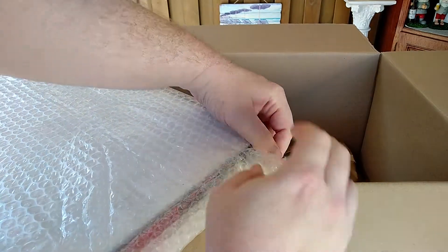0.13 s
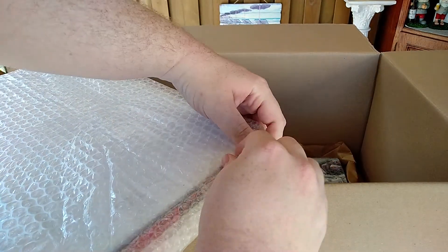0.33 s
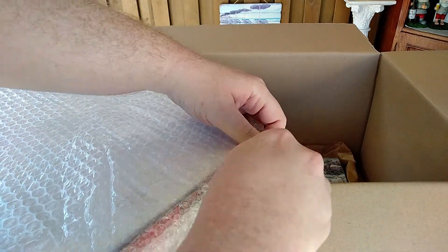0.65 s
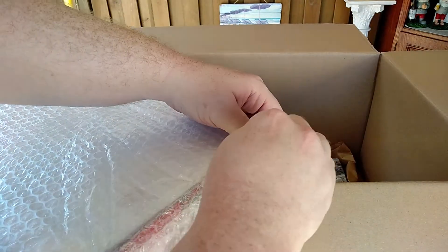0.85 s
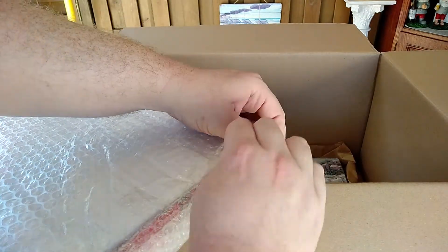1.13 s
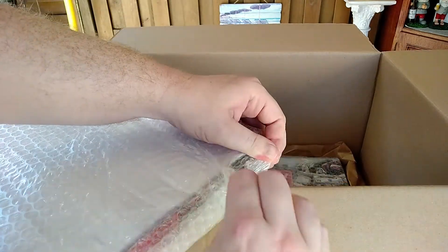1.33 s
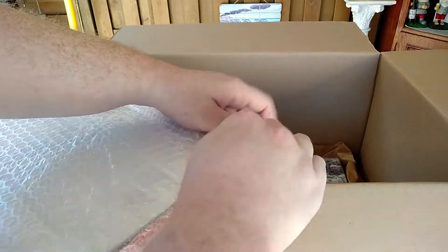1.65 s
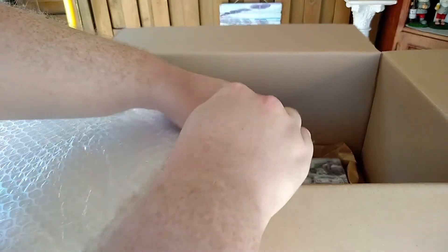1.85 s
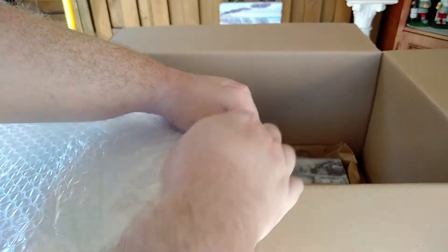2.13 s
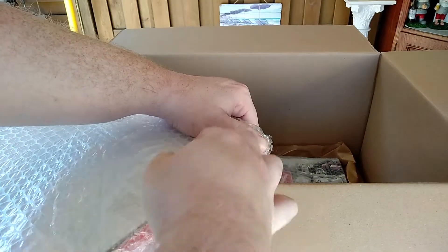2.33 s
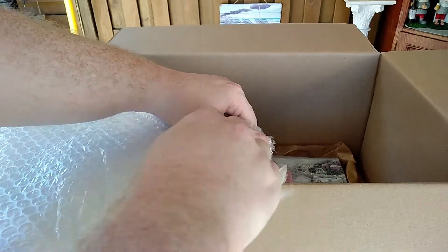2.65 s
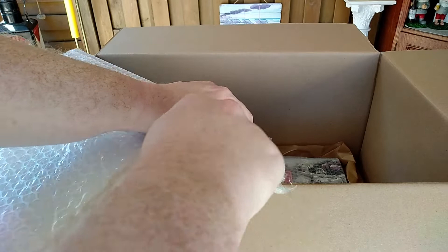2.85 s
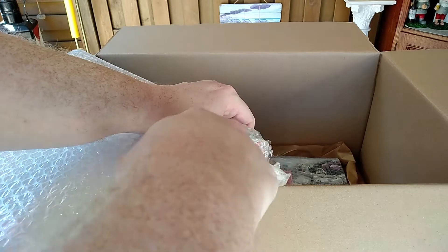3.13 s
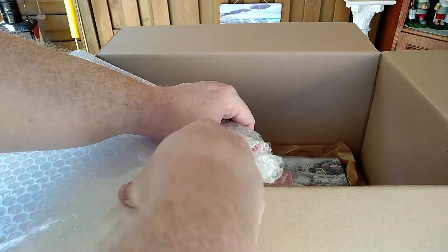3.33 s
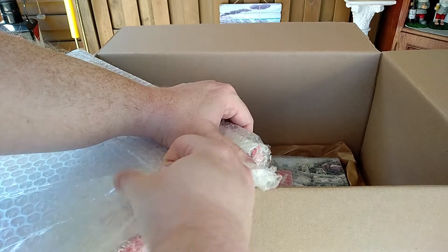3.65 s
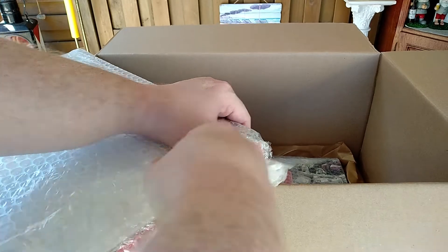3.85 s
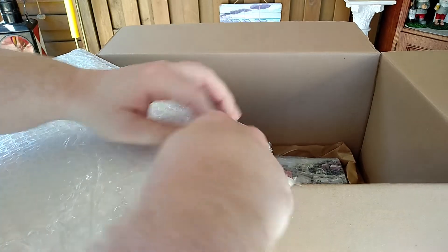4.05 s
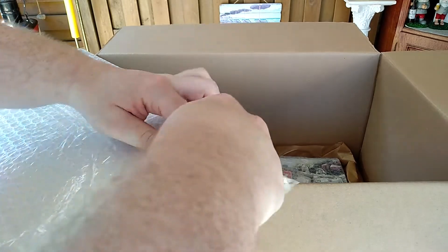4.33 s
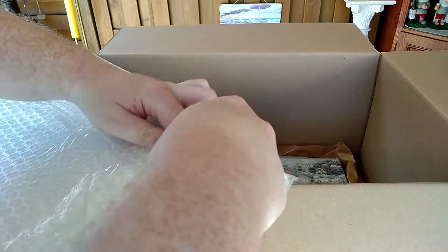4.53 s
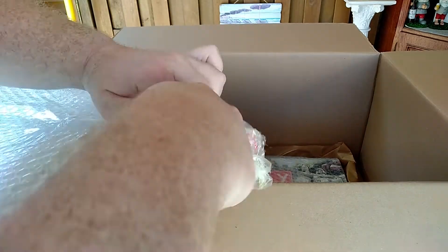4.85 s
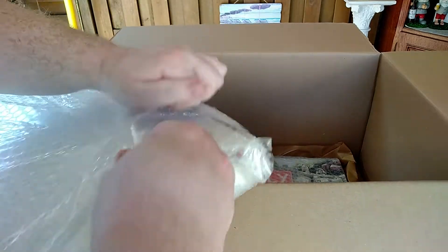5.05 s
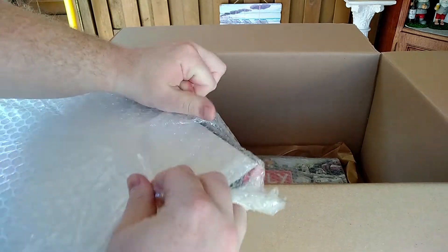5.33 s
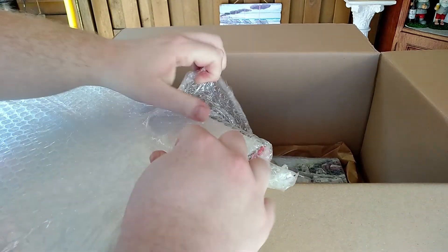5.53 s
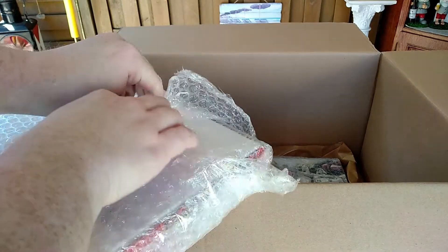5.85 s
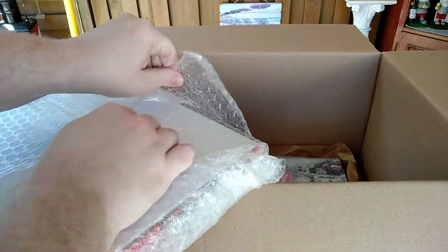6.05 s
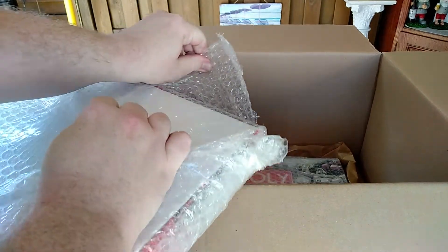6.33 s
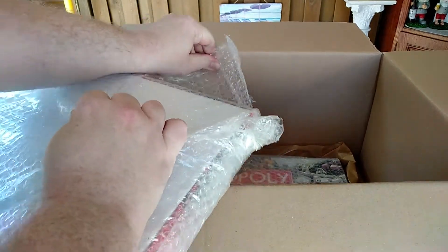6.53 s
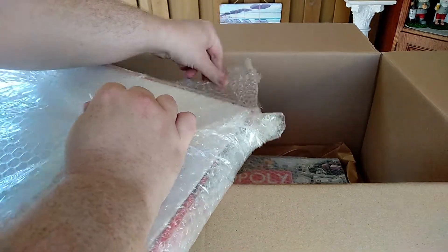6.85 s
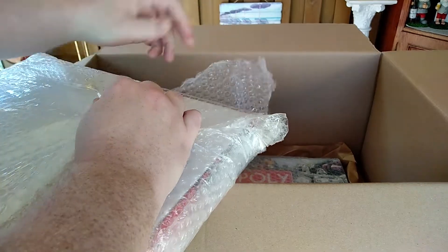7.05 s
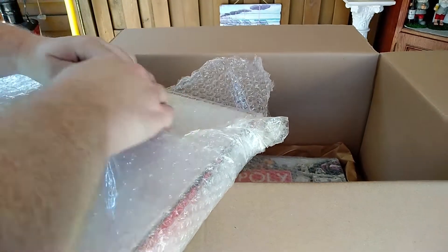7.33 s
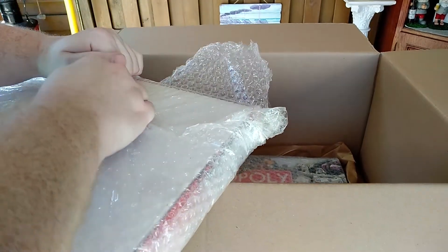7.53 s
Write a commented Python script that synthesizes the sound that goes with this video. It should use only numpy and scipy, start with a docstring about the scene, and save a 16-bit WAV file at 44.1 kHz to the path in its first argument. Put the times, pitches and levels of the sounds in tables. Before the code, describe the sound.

Hands tug and peel bubble wrap from a flat box inside a cardboard carton, crackling, snapping and popping in uneven bursts, ending on a heavy knock.

```python
"""Two hands pull bubble wrap off a flat box in a big cardboard carton, in a small wood-panelled room.
A tug and a few snaps open; near 1 s pulls and crackling crowd together with two pops, then the hands ease off.
Near 2.2 s comes a strong snapping pull, from 3.1 s more pops, near 5 s a loud peel, from 6 s dense snaps and rubs;
the last pulls end on a heavy knock. Film is noise from tiny stick-slips; creases, bubbles and board are
impulses in damped resonators; drags are filtered grains. Light handling, faint air and a hum lie beneath."""
import sys
import numpy as np
from scipy import signal
from scipy.fft import rfft, irfft, next_fast_len
from scipy.io import wavfile
from scipy.ndimage import map_coordinates

SR = 44100
rng = np.random.default_rng(int(sys.argv[2]) if len(sys.argv) > 2 else 0)


def wrap_up_sound(samples):
    """Save the sound to the file named by the first command line argument, as 16-bit audio."""
    columns = np.atleast_2d(samples).T
    # keep every value between -1 and 1, then stretch to whole-number steps
    tamed = np.clip(columns, -1, 1)
    steps = np.round(tamed * 32767).astype(np.int16)
    wavfile.write(sys.argv[1], SR, steps)


N = 339570
TIME = np.arange(N) / SR   # s

# Levels in the tables are relative: mixing trims and filters follow.
# light handling between the moves: t/s, level/dB
HANDLING = [(0.1, -45), (0.42, -53.5), (0.66, -54), (1.45, -42), (1.62, -51), (1.78, -41), (2.0, -50.5),
            (2.44, -45), (2.5, -58), (2.56, -42), (2.68, -44), (3.3, -45.5), (3.64, -46), (3.75, -41.5),
            (3.98, -62), (4.6, -38.5), (5.17, -43.5), (5.66, -51.5), (5.76, -42), (5.86, -34),
            (6.98, -49.5), (7.3, -33)]


def film(pull_db, sheen_db):
    """Stick-slip friction: a patch of wrap slides and peels in jerks; the faster it goes, the thicker the slips."""
    release_db = 2.23 * np.minimum(jerks(per_s=70, dying_s=0.0088), 3)
    speed = from_db(pull_db - 7.0 + drift(43) + release_db)
    sound = speed * sizzle(per_s=700 + 9e4 * speed)
    sheen = (from_db(sheen_db) - 1) * resonate(sound, 13500, 9400)
    return sound + sheen


def sizzle(per_s):
    """Granular friction noise: thin film rubbing on film makes tiny bright slips over a faint hiss."""
    # sliding film: f/Hz, spectral level/dB
    film_spectrum = [(1200, -16), (2500, -14.5), (3300, -11.5), (4100, -8), (4900, -9), (6500, -4.5),
                     (8200, 0.7), (9800, 1.9), (11200, -0.5), (12500, -3.5), (15800, -10)]
    slips = grains(per_s, spread_db=1.5, low_hz=3000, high_hz=15260, cycles=5.7, patchy_db=3.0, count=9)
    hiss = from_db(-6) * rng.standard_normal(N)
    return colour(slips + hiss, film_spectrum)


def crumple(squeeze_db, crisp_db, hollow_hz):
    """Buckling of thin shells: bubbles crushed by one hand give way in fits, crisp when taut, hollow when slack."""
    # crushed bubbles: f/Hz, spectral level/dB
    crush_spectrum = [(300, -22), (600, -12), (1100, -3.5), (2000, 7), (3000, 5), (4500, 3), (7000, -14)]
    level = from_db(squeeze_db - 7.0)
    crackle = grains(258 + 2.5e4 * level, spread_db=4.0, low_hz=460, high_hz=5300,
                     cycles=1.04, patchy_db=2.5, count=9)
    fits_db = 2.2 * np.minimum(jerks(per_s=60, dying_s=.006), 2)
    sound = level * from_db(fits_db) * colour(crackle, crush_spectrum)
    crisp = (from_db(crisp_db) - 1) * resonate(sound, 3500, 3100)
    hollow = (from_db(-.4 * crisp_db) - 1) * resonate(sound, hollow_hz, 650)
    return sound + crisp + hollow


def snaps(pull_db):
    """Snap-through buckling: a crease flips in one damped, shivering swing, and a ragged tick runs along its fold."""
    # creases snapping through: t/s, swing peak level/dB, swing f/Hz, tick peak level/dB
    creases = [(0.01, -16, 3530, -18), (0.104, -30, 1840, -38), (0.119, -28, 1990, -32),
               (0.2378, -36, 3790, -13.5), (0.384, -34, 2110, -40), (0.56, -24, 3450, -22),
               (0.604, -37, 3890, -14), (0.723, -36, 2800, -23), (0.8375, -41, 2540, -22),
               (0.9, -26, 3000, -30), (1.035, -13, 2340, -10), (1.0693, -24, 2800, -6),
               (1.089, -22, 3000, -8), (1.1025, -25, 3000, -15), (1.108, -13, 2080, -17),
               (1.1605, -31, 2000, -2), (1.208, -23, 3000, -12), (1.2452, -23, 3360, -6),
               (1.255, -22.5, 2000, -20), (1.39, -31, 3260, -30), (1.445, -28.5, 1980, -34),
               (1.495, -35, 2070, -42), (1.516, -48, 3000, -26), (1.554, -28, 3970, -27),
               (1.738, -40, 3000, -24), (1.756, -27, 3450, -26), (1.769, -29, 3090, -32),
               (1.856, -28, 2100, -31), (1.899, -26, 3780, -36), (1.956, -33, 1700, -40),
               (2.005, -42, 2775, -40), (2.0363, -30, 2020, -25), (2.049, -13.5, 1900, -14),
               (2.106, -22, 2000, -15), (2.113, -5, 3590, -13), (2.1455, -10.5, 2260, -5),
               (2.1657, -3.5, 3160, -7), (2.1747, -14, 3000, -7), (2.198, -14, 2800, -8),
               (2.2285, -10, 3340, -4), (2.2396, -4.5, 1850, -10), (2.243, -6, 1690, -16),
               (2.314, -32, 2400, -12), (2.33, -18, 1100, -25), (2.422, -34, 3000, -23),
               (2.7138, -24, 1280, -34), (2.745, -29, 2010, -34), (2.797, -29, 2510, -38),
               (2.845, -30, 2150, -26), (2.867, -23, 2020, -28), (3.012, -26, 3890, -34),
               (3.0612, -43, 2930, -5.5), (3.104, -16, 2000, -12), (3.141, -18, 2200, -28),
               (3.282, -36, 3000, -26), (3.4125, -25, 4000, -12), (3.419, -16, 3000, -5),
               (3.436, -6, 1500, -20), (3.4462, -10, 1900, -18), (3.5675, -24.5, 2060, -23),
               (3.666, -35, 1750, -26), (3.694, -46, 3000, -18), (3.834, -5.5, 3000, -12),
               (4.017, -29, 2240, -40), (4.051, -23.5, 2060, -32), (4.273, -26, 1500, -24),
               (4.363, -19, 1800, -39), (4.483, -17.5, 2370, -20), (4.512, -24.5, 1600, -23),
               (4.661, -22, 1500, -22), (4.689, -22, 2008, -25), (4.934, -19, 1580, -16),
               (4.937, -19, 2030, -20), (4.979, -5, 2200, -17), (5.14, -38, 3000, -16),
               (5.2156, -22, 1500, -24), (5.277, -24, 1790, -19), (5.45, -23, 2650, -25),
               (5.51, -30, 1830, -25), (5.551, -20, 1340, -33), (5.615, -21.5, 1900, -20),
               (5.689, -38, 1880, -9.5), (5.731, -38, 2500, -17), (5.891, -27, 1000, -30),
               (5.911, -14.5, 2290, -14), (5.975, -9, 2000, -12), (6.092, -19, 2130, -16),
               (6.18, -16, 1662, -15), (6.207, -10.5, 1970, -15), (6.2545, -34, 3400, -2),
               (6.313, -18, 2160, -16), (6.339, -25, 3500, -9), (6.4528, -20.5, 1110, -13),
               (6.484, -40, 1100, -24), (6.5073, -15, 1700, -8), (6.517, -12, 1500, -18),
               (6.546, -20, 1800, -10.5), (6.662, -23.5, 1010, -32), (7.0422, -21.5, 1065, -43),
               (7.1806, -23, 1650, -25), (7.261, -28, 1580, -23), (7.336, -30, 3200, -2),
               (7.407, -18, 1750, -16), (7.589, -20, 2500, -9)]
    shiver_db, shiver_s, run_s = -19, .0012, .001   # shiver against the flip; fading times
    handled = stray_snaps(in_time(HANDLING)[0], per_s=11, swing_db=2.5, tick_db=11.5)
    pulled = stray_snaps(pull_db, per_s=45, swing_db=-3.0, tick_db=0.0)
    out, click = np.zeros(N), signal.unit_impulse(SR // 50)
    t = TIME[:len(click)]
    for s, swing_db, hz, tick_db in creases + handled + pulled:
        shiver = from_db(shiver_db) * rng.standard_normal(len(t)) * np.exp(-t / shiver_s)
        swing = resonate(click + shiver, 1.01 * hz, 0.65 * hz)
        swing = band(swing, 2.28 * hz, "low")
        run = rng.standard_normal(len(t)) * np.exp(-t / run_s)
        tick = band(resonate(run, 8800, 2600), 6700, "high")
        add(out, s, from_db(swing_db - 2.33) * swing / abs(swing).max())
        add(out, s, from_db(tick_db - 1.5) * tick / abs(tick).max())
    return out


def stray_snaps(level_db, per_s, swing_db, tick_db):
    """Random buckling: small creases let go at chance moments, as strong as the hands are lively."""
    middle_hz, spread_db = 1900, 5.0   # pitch strays an octave, strength spread_db, either way
    s, swing, pitch, tick = rng.random((int(per_s * N / SR), 4)).T
    s = s * N / SR
    db = np.interp(s, TIME, level_db)
    swing_peak_db = db + swing_db + spread_db * (2 * swing - 1)
    tick_peak_db = db + tick_db + spread_db * (2 * tick - 1)
    return list(zip(s, swing_peak_db, middle_hz * 2 ** (2 * pitch - 1), tick_peak_db))


def pops():
    """Impulsive release: a taut bubble gives way with a sharp broad crack, then its skin rings a few cycles."""
    # bubbles: t/s, ring peak level/dB, ring f/Hz, crack peak level/dB
    bubbles = [(0.859, -14, 1450, -8), (1.0187, -8, 1290, -9), (3.085, -5, 1350, -10),
               (3.093, -2.5, 1360, -1), (3.2342, -7, 1160, -9), (3.4244, -6.5, 1310, -9),
               (4.7352, -23, 950, -42)]
    damping = .36   # resonance width against the bubble's pitch
    upper_ratio, upper_db = 1.6, -2   # second mode of the skin
    crack_s = .0006   # fading time
    out, t = np.zeros(N), TIME[:SR // 50]
    click = signal.unit_impulse(len(t))
    for s, db, hz, crack_db in bubbles:
        upper = from_db(upper_db) * resonate(click, upper_ratio * hz, damping * hz)
        ring = resonate(click, hz, damping * hz) + upper
        ring = band(ring, 2.9 * hz, "low")
        burst = 0.19 * rng.standard_normal(len(t)) * np.exp(-t / crack_s)
        crack = band(click + burst, [2400, 5200], "band")
        add(out, s, from_db(db) * ring / abs(ring).max() + from_db(crack_db) * crack / abs(crack).max())
    return out


def squeaks(count=3):
    """Periodic stick-slip: taut film slips fast enough to give a short gliding tone with overtones."""
    # film on film: t/s, length/s, first f/Hz, last f/Hz, level/dB, each overtone against the one below/dB
    glides = [(0.946, 0.015, 1800, 2270, -39.5, -10), (4.849, .037, 2100, 718, -45, -1)]
    jitter, flutter_db = .035, 3   # uneven slipping: pitch (share) and level
    out = np.zeros(N)
    for s, length, first_hz, last_hz, db, overtone_db in glides:
        hz = np.geomspace(first_hz, last_hz, int(length * SR))
        phase = 2 * np.pi * np.cumsum(hz * (1 + jitter * drift(400)[:len(hz)])) / SR
        tone = sum(from_db(k * overtone_db) * np.sin((k + 1) * phase) for k in range(count))
        swell = np.sqrt(np.hanning(len(hz)))
        flutter = from_db(flutter_db * drift(300)[:len(hz)])
        add(out, s, from_db(db + 3) * swell * flutter * tone)
    return out


def box():
    """Forced vibration of a board: the box rumbles under drags, thuds under knocks and groans under judder."""
    return drags() + knocks() + judders()


def drags():
    """Sliding friction: hands dragging on the box excite dull random grains."""
    # drags: peak t/s, build/s, release/s, level/dB
    strokes = [(0.02, 0.078, 0.046, -47), (0.56, 0.018, 0.034, -61), (0.86, 0.0081, 0.02, -33),
               (1.01, 0.014, 0.028, -29), (1.11, .05, 0.16, -46), (1.39, 0.041, 0.077, -40.5),
               (1.85, 0.056, 0.23, -51), (2.17, 0.086, 0.28, -37), (2.31, .15, 0.19, -39.5),
               (2.59, 0.11, 0.12, -46.5), (3.1, 0.095, 0.17, -42), (3.33, 0.04, 0.11, -43.5),
               (3.84, 0.035, 0.11, -39), (4.03, 0.083, 0.022, -48.5), (4.22, 0.18, 0.24, -49),
               (4.4, 0.079, 0.18, -40), (4.68, 0.04, 0.016, -37.5), (4.765, 0.051, 0.083, -38),
               (4.93, 0.02, 0.47, -35), (5.05, 0.2, 0.13, -37), (5.345, 0.091, 0.15, -32),
               (5.55, 0.018, 0.11, -38), (5.98, 0.07, 0.06, -29.5), (6.18, 0.29, 0.34, -35),
               (6.46, 0.036, 0.41, -35), (6.6, 0.028, 0.061, -40), (6.93, 0.15, 0.044, -47),
               (7.1, 0.096, 0.091, -33.5), (7.185, 0.057, 0.048, -36), (7.528, 0.03, 0.055, -29),
               (7.607, 0.017, 0.04, -23.5), (7.65, 0.034, 0.1, -29), (7.69, 0.054, .06, -32.5)]
    # rubbed board: f/Hz, spectral level/dB
    box_spectrum = [(30, -17), (60, -12), (110, -9), (170, -6.5), (300, 3), (550, 3), (900, 1.5),
                    (1600, 4.5)]
    rub = grains(1200, spread_db=5.0, low_hz=81.4, high_hz=1100, cycles=2.4, patchy_db=4.0)
    return from_db(moves(strokes, idle_db=-14)[0] - 5.0) * colour(rub, box_spectrum)


def knocks():
    """Impulse response of a damped board: each knock rings its own mode and a low one they share."""
    # fingers and box: t/s, peak level/dB, f/Hz, width/Hz (wide where the hand damps the board)
    blows = [(0.023, -35.5, 385, 105), (0.18, -45, 480, 200), (0.216, -38.5, 225, 105),
             (0.557, -44.5, 620, 105), (0.983, -42, 200, 105), (1.01, -47, 557, 105),
             (1.551, -43.5, 144, 105), (1.642, -43, 243, 105), (1.952, -43, 415, 105),
             (2.594, -43, 200, 105), (3.305, -34, 204, 105), (3.329, -34.5, 260, 90),
             (3.396, -38, 220, 105), (3.523, -40.5, 735, 150), (3.833, -33.5, 744, 105),
             (4.48, -36, 220, 150), (4.735, -25, 1000, 130), (4.759, -31, 600, 200), (5.224, -29, 330, 150),
             (5.335, -24.5, 390, 110), (5.356, -28, 400, 170), (5.551, -28.5, 553, 200),
             (5.613, -25.5, 513, 150), (5.689, -38, 525, 200), (5.89, -39, 530, 105),
             (6.275, -29, 635, 105), (6.387, -35, 200, 105), (6.451, -27, 344, 105), (6.482, -35, 327, 130),
             (6.608, -31, 360, 129), (7.069, -30, 192, 60), (7.091, -26, 192, 55), (7.111, -33, 188, 55),
             (7.18, -31, 497, 200), (7.407, -35, 645, 201), (7.52, -31, 220, 200), (7.573, -31, 230, 130),
             (7.6, -11.5, 290, 330), (7.646, -24, 190, 130)]
    out, click = np.zeros(N), signal.unit_impulse(SR // 8)
    for s, db, hz, width_hz in blows:
        thud = resonate(click, hz, width_hz) + 0.27 * resonate(click, 148, 78)
        thud = band(thud, 800, "low")
        add(out, s, from_db(db - 1.5) * thud / abs(thud).max())
    return out


def judders():
    """Slow stick-slip: skin catching on the taut wrap rings the board once for each slip."""
    # judders: t/s, length/s, slips per s, first resonance f/Hz, last resonance f/Hz, level/dB
    catches = [(3.705, 0.089, 108, 734, 680, -57), (4.89, 0.052, 155, 546, 484, -49),
               (5.213, 0.049, 125, 530, 590, -37), (5.29, 0.019, 170, 430, 503, -49),
               (5.317, 0.042, 160, 776, 660, -44.5), (6.138, 0.057, 138, 590, 660, -41.5),
               (6.56, 0.06, 180, 1220, 1030, -41.5), (7.072, 0.088, 110, 496, 580, -44)]
    scatter_oct, slip_width_hz = .1, 120   # pitch scatter and resonance width of the slips
    out, click = np.zeros(N), signal.unit_impulse(SR // 8)
    for s, length, per_s, first_hz, last_hz, db in catches:
        groan = np.zeros(N)
        for t in np.arange(0, length, 1 / per_s):
            hz = np.interp(t, [0, length], [first_hz, last_hz])
            hz = hz * 2 ** (scatter_oct * rng.standard_normal())
            # the grip bites early, then lets go
            grip = np.sin(np.pi * np.sqrt((t + 1 / per_s) / (length + 1 / per_s)))
            add(groan, t + rng.uniform(0, 0.313) / per_s, grip * resonate(click, hz, slip_width_hz))
        groan = band(groan[:int(length * SR) + SR // 50], 1.22 * first_hz, "low")
        add(out, s, from_db(db + 0.5) * rms_one(groan))
    return out


def cardboard(x):
    """Modal resonance: whatever shakes the box sets its panels ringing."""
    # panel modes: f/Hz, width/Hz, lift/dB
    panels = [(165, 51, 6), (530, 27, 1.5), (676, 47, 2.5), (820, 45, 3.5), (970, 18, 4)]
    return x + sum((from_db(db) - 1) * resonate(x, hz, width_hz) for hz, width_hz, db in panels)


def moves(rows, idle_db):
    """Energy addition: hand moves over light handling; level in dB, then further columns weighted by power."""
    range_db, roundness = 23.5, 1.148   # build and release are the times taken to cover range_db
    rows, t = np.array(rows), TIME[::40]
    since = t - rows[:, :1]
    away = np.maximum(-since / rows[:, 1:2], since / rows[:, 2:3])
    power = from_db(rows[:, 3:4] - range_db * away ** roundness) ** 2
    idle = from_db(np.interp(t, *np.transpose(HANDLING)) + idle_db) ** 2
    total = power.sum(axis=0) + idle
    weighted = rows[:, 4:].T @ power / total
    return [np.interp(TIME, t, c) for c in (10 * np.log10(total), *weighted)]


def jerks(per_s, dying_s):
    """Stick and slip: sudden releases at random that fade exponentially; mean 0, spread 1."""
    starts = (rng.random(N) < per_s / SR) + 1e-18
    releases = signal.lfilter([1], [1, -np.exp(-1 / (dying_s * SR))], starts)
    return rms_one(releases - releases.mean())


def grains(per_s, spread_db, low_hz, high_hz, cycles, patchy_db, count=12):
    """Shot noise in resonators: uneven random slips ring a few cycles in facets; equally loud sparse or dense."""
    born = rng.random(N) < per_s / SR
    sizes = from_db(spread_db * np.minimum(rng.exponential(1, N), 3.5)) / np.sqrt(per_s)
    clicks = born * sizes * rng.choice([-1, 1], N)
    dealt = rng.integers(0, count, N)   # which facet each slip rings
    out = np.zeros(N)
    for k, hz in enumerate(np.geomspace(low_hz, min(high_hz, .45 * SR), count)):
        ringing = resonate(clicks * (dealt == k), hz, hz / cycles)
        out += ringing * from_db(patchy_db * drift(23.0)) / np.sqrt(hz)
    return rms_one(out)


def direct(x, aside_deg):
    """Interaural-type delay: sound from the right reaches the left port a little later."""
    # where the hands work: t/s, bearing to the right/degrees
    bearing = [(0, 5.5), (0.9, -4), (1.6, -0.5), (2.2, 20), (2.7, 16.5), (3.1, 14.5), (3.5, 21.5),
               (5.75, 17), (6.3, 17), (7.7, 22.5)]
    spacing_m, sound_speed = .14, 343   # between the ports; m/s
    angle = np.radians(in_time(bearing)[0] + aside_deg)
    lag = spacing_m / sound_speed * np.sin(angle) * SR   # samples
    return np.array([map_coordinates(x, [np.arange(N) - lag], order=3), x])


def room(x, count=3):
    """Diffuse reverberation: scatter off carton and walls; the echo pattern shifts as the arms move."""
    # room: f/Hz, reverberation time/s
    reverberation = [(100, 0.25), (500, 0.28), (2000, 0.31), (8000, 0.027), (16000, 0.28)]
    build_s = .004   # build-up of the first echoes off the carton walls
    t, edges = TIME[:SR // 3], np.geomspace(60, 19000, 8)
    shares = np.array([drift(4.98) for k in range(count)])
    shares /= np.sqrt(np.sum(shares ** 2, axis=0))
    out = 0
    for share in shares:
        noise, tail = diffuse(len(t)), 0
        for k, (lo, hi) in enumerate(zip(edges, edges[1:])):
            decay = from_db(-60 * t / at_hz(reverberation, np.sqrt(lo * hi)))
            tail = tail + band(noise, [lo, hi], "band") * decay * (-1) ** k
        near_walls = 1 + 7.1 * np.exp(-t / 0.0074)   # the near carton walls answer first
        tail = tail * (1 - np.exp(-(t / build_s) ** 2)) * near_walls
        tail = rms_one(tail) / np.sqrt(len(t))
        out = out + signal.fftconvolve((x * share)[None], tail, axes=1)[:, :N]
    return out


def diffuse(size):
    """Diffuse-field coherence: noise from all sides, more alike at both ports in the bass than in the treble."""
    # likeness of the ports: f/Hz, left-right correlation
    likeness = [(60, 0.8), (250, 0.78), (500, 0.15), (1000, 0), (2000, 0.21), (16000, 0.0)]
    mid, side = rfft(rng.standard_normal((2, size)))
    alike = np.clip(at_hz(likeness, np.fft.rfftfreq(size, 1 / SR)), -1, 1)
    return irfft(np.sqrt((1 + alike) / 2) * mid + np.sqrt((1 - alike) / 2) * side * [[1], [-1]], size)


def air():
    """Stationary diffuse noise: the faint air of the room."""
    # room air: f/Hz, spectral level/dB
    air_spectrum = [(15, -48), (25, -15), (87, 1.5), (293, -8.5), (1070, -26), (2050, -1), (5140, -24),
                    (8360, -19), (14800, -6), (16000, -25)]
    return from_db(-60.5) * colour(diffuse(N), air_spectrum)


def hum():
    """Pure tone with slow amplitude modulation: a faint hum in the room."""
    # hum: f/Hz, middle rms level/dB
    hum_hz, hum_db = (107.7, -78)
    return np.sqrt(2) * from_db(hum_db + drift(3)) * np.sin(2 * np.pi * hum_hz * TIME)


def from_db(db):
    """Logarithmic level: decibels to an amplitude factor."""
    return 10 ** (np.asarray(db) / 20)


def rms_one(x):
    """Effective value: scale a signal to rms 1."""
    return x / np.sqrt(np.mean(x ** 2) + 1e-20)


def in_time(rows):
    """Linear interpolation: the columns of a table, joined by straight lines."""
    s, *columns = np.transpose(rows)
    return [np.interp(TIME, s, c) for c in columns]


def at_hz(points, hz):
    """Logarithmic pitch scale: read a spectrum on a log-frequency axis."""
    f, value = np.transpose(points)
    return np.interp(np.log(hz + 1), np.log(f), value)


def drift(rate):
    """Low-passed noise: slow chance below about `rate` Hz, spread 1."""
    r = np.exp(-80 * np.pi * rate / SR)   # pole, at one value every 40 samples
    noise = rng.standard_normal(N // 40 + 2002)
    slow = signal.lfilter([1], [1, -2 * r, r * r], noise)[2000:]
    return np.interp(np.arange(N) / 40, np.arange(len(slow)), rms_one(slow))


def band(x, hz, kind):
    """Butterworth filtering: a gentle causal filter."""
    sos = signal.butter(2, np.clip(hz, 10, .45 * SR), kind, fs=SR, output="sos")
    return signal.sosfilt(sos, x + 1e-18)


def resonate(x, hz, width_hz):
    """Damped oscillator: one resonance, gain 1 on top."""
    r = np.exp(-np.pi * width_hz / SR)
    gain = np.array([1, 0, -1]) * (1 - r * r) / 2
    return signal.lfilter(gain, [1, -2 * r * np.cos(2 * np.pi * hz / SR), r * r], x + 1e-18)


def colour(x, spectrum):
    """Spectral shaping: weight a texture by a spectrum; rms 1."""
    size = next_fast_len(N)
    weight = from_db(at_hz(spectrum, np.fft.rfftfreq(size, 1 / SR)))
    return rms_one(irfft(rfft(x, size) * weight, size)[..., :N])


def add(out, s, sound):
    """Superposition: mix a sound in from a given time."""
    start = int(np.clip(round(s * SR), 0, N - 1))
    out[start:start + len(sound)] += sound[:N - start]


def scene():
    """Superposition of a patch of wrap under each hand, creases, bubbles, the box, its echoes, air and hum."""
    # pulls on the film: peak t/s, build/s, release/s, level/dB, top treble lift/dB, left over right/dB
    pulls = [(0.003, 0.014, 0.054, -17.5, -2.5, 0), (0.239, 0.051, 0.028, -31.5, 0.5, -4),
             (0.33, .025, 0.17, -44.5, 10, -3), (0.568, 0.14, 0.079, -31.5, -1, -1),
             (0.738, 0.23, 0.12, -38, 4, -2.5), (0.838, 0.005, 0.026, -37, 0, 0),
             (0.866, 0.054, 0.063, -23.5, -0.5, -2.5), (1.01, 0.18, 0.13, -31, 11.5, -2),
             (1.069, 0.025, 0.014, -16.5, 1.5, -3), (1.089, 0.018, 0.011, -17.5, 4, -2),
             (1.103, .012, 0.015, -17, 7, 2), (1.12, 0.069, 0.13, -26, 2, 1),
             (1.161, 0.12, 0.08, -20.5, 5.5, -2.5), (1.258, 0.061, 0.082, -25, 7, -4),
             (1.401, 0.038, 0.042, -27, 4.5, 3), (1.9, 0.26, 0.11, -38.5, -13, -2),
             (2.103, 0.083, 0.13, -20.5, -1.5, -3.5), (2.161, 0.048, 0.25, -17.5, 3.5, -1.5),
             (2.255, 0.2, 0.048, -18.5, 3, -3), (2.426, 0.11, 0.048, -30, -7, -3.5),
             (2.63, 0.084, 0.23, -44, 4, -3.5), (2.772, 0.12, 0.078, -35.5, -18, 3),
             (2.85, 0.049, 0.066, -31.5, -2, -4), (2.95, 0.05, 0.19, -30, -6, 1.5),
             (3.101, 0.069, 0.12, -26.5, 1.5, 0), (3.236, 0.028, 0.17, -34, 1, -9),
             (3.421, 0.013, 0.007, -15.5, 2.5, -6), (3.44, 0.014, 0.048, -21.5, -11, 0),
             (3.568, 0.028, 0.059, -38.5, 8, -14), (3.767, 0.17, 0.41, -39, 2, -3),
             (3.834, 0.041, 0.094, -25, -6, -1), (4.055, 0.087, 0.014, -32.5, -3, -4),
             (4.274, 0.25, 0.051, -36.5, 1.5, -0.5), (4.415, 0.099, 0.043, -33.5, -2, -7),
             (4.49, 0.037, 0.15, -36, 2, -6), (4.72, 0.18, 0.12, -31.5, 0, 0.5),
             (4.92, 0.063, 0.06, -28.5, 5, -7), (5.022, 0.096, 0.072, -12.5, 0, -1),
             (5.122, 0.038, 0.04, -32.5, 9.5, -2), (5.278, 0.11, 0.065, -34.5, 10, -1),
             (5.432, 0.18, 0.13, -34, 4.5, 0.5), (5.56, 0.19, 0.17, -39, -0.5, -1),
             (5.684, 0.011, 0.2, -40, 20.5, 6), (5.8, 0.11, 0.12, -38.5, 9, 5),
             (5.974, 0.094, 0.099, -19, 0.5, 0.5), (6.102, 0.21, 0.072, -26, 7, -1.5),
             (6.21, 0.12, 0.25, -25, 10, -2), (6.247, 0.03, 0.058, -36, 9, 2),
             (6.312, 0.055, 0.04, -25.5, 7.5, 1), (6.355, 0.079, 0.081, -22.5, 9.5, -2),
             (6.455, 0.038, 0.1, -29, 10.5, -2), (6.51, 0.021, 0.21, -30, 9.5, 2),
             (6.604, 0.12, 0.11, -26.5, 2.5, 0), (6.79, 0.18, 0.067, -41, 12, 1),
             (6.868, 0.086, 0.035, -33, -6, 0), (7.164, 0.17, 0.087, -25, -5.5, -2.5),
             (7.337, 0.019, 0.055, -19.5, 2.5, -2), (7.415, 0.024, 0.15, -16, 3.5, -3),
             (7.6, 0.17, 0.11, -18, 2.5, -0.5)]
    # squeezes of the bubbles: peak t/s, build/s, release/s, level/dB, tautness as lift of the crisp crackle/dB
    squeezes = [(0.016, 0.037, 0.096, -50, 11), (0.12, 0.055, 0.04, -47, 2), (0.388, .03, 0.028, -56, 2),
                (0.732, 0.1, 0.014, -42.5, 0.5), (0.866, 0.066, 0.18, -39, -12),
                (1.018, 0.059, 0.088, -33, 4.5), (1.117, 0.052, 0.055, -23, -3.5),
                (1.24, 0.24, 0.06, -38.5, -3), (1.393, 0.022, 0.14, -48.5, 8),
                (2.168, 0.056, 0.083, -27.5, 3.5), (2.243, 0.051, 0.088, -25, 3),
                (2.765, 0.092, 0.085, -45.5, 8), (2.869, 0.05, 0.014, -38.5, 11.5),
                (3.095, 0.016, 0.092, -26.5, 4), (3.245, 0.023, 0.1, -40.5, -7),
                (3.445, 0.02, 0.055, -23.5, -8), (3.835, 0.023, 0.044, -32, 1),
                (3.915, .02, 0.018, -39, -13), (4.24, 0.23, 0.14, -45.5, -1),
                (4.402, 0.051, 0.045, -33, -1.5), (4.665, 0.051, 0.14, -35.5, -7),
                (4.94, 0.088, 0.15, -38, -16), (5.045, 0.17, 0.033, -29, 2),
                (5.224, 0.045, 0.16, -36.5, -0.5), (5.432, 0.064, 0.087, -40.5, 7),
                (5.615, 0.018, 0.0077, -36.5, 4), (5.865, 0.082, 0.052, -37.5, -1.5),
                (5.974, 0.035, 0.048, -23, 2), (6.1, 0.17, 0.45, -39, -17), (6.32, 0.19, 0.14, -37, -15),
                (6.465, .04, 0.067, -41, -4), (6.578, 0.24, 0.13, -32, -4), (7.208, 0.26, 0.13, -39, -1.5),
                (7.439, 0.17, 0.047, -33, -4.5), (7.61, 0.22, 0.092, -36, -24)]
    film_deg, grip_deg = 5.1, 19   # each hand to its side of the middle
    pull_db, sheen_db, pan_db = moves(pulls, idle_db=1)
    squeeze = moves(squeezes, idle_db=-10.5)

    left_film, right_film = film(pull_db, sheen_db), film(pull_db, sheen_db)
    wrap = direct(left_film, -film_deg) + direct(right_film, film_deg)
    wrap = wrap + room(from_db(1.0) * (left_film + right_film))
    wrap = wrap * from_db((pan_db + 1.0) * np.array([[.5], [-.5]]))

    left_grip = cardboard(crumple(*squeeze, hollow_hz=950))
    right_grip = cardboard(crumple(*squeeze, hollow_hz=1240))
    cracks = snaps(pull_db) + squeaks()
    bursts = pops()
    thuds = from_db(-0.5) * cardboard(box())
    near = direct(left_grip, -grip_deg) + direct(right_grip, grip_deg)
    near = near + direct(cracks + bursts + thuds, 0)
    echoes = room(left_grip + right_grip + from_db(-6.5) * cracks
                  + from_db(-7.0) * bursts + from_db(-4.0) * thuds)
    return wrap + near + echoes + air() + hum()


def record(dry):
    """Port resonance and saturation: each port colours its treble, high peaks are rounded and the top is cut."""
    peak_limit, cutoff_hz = .62, 16000
    left = (dry[0] - 1.17 * resonate(dry[0], 7520, 2670) + 0.84 * resonate(dry[0], 7620, 1850)
            + 0.13 * resonate(dry[0], 20000, 3200))
    right = (dry[1] + 0.18 * resonate(dry[1], 7940, 1000) - 0.5 * resonate(dry[1], 10320, 3240)
             - 0.42 * resonate(dry[1], 13400, 4300))
    rounded = peak_limit * np.tanh(np.array([left, right]) / peak_limit)
    return signal.sosfilt(signal.ellip(12, .1, 80, cutoff_hz, fs=SR, output="sos"), rounded)


dry = scene()
out = record(dry)
wrap_up_sound(out)
```